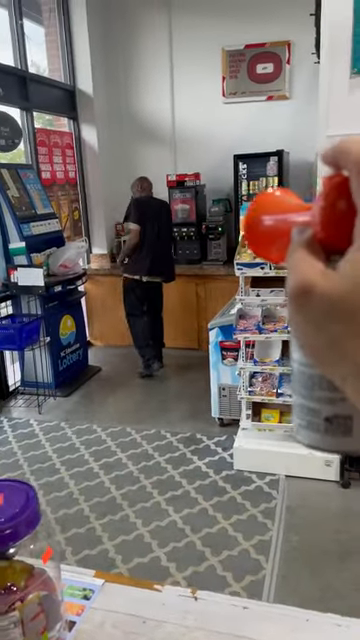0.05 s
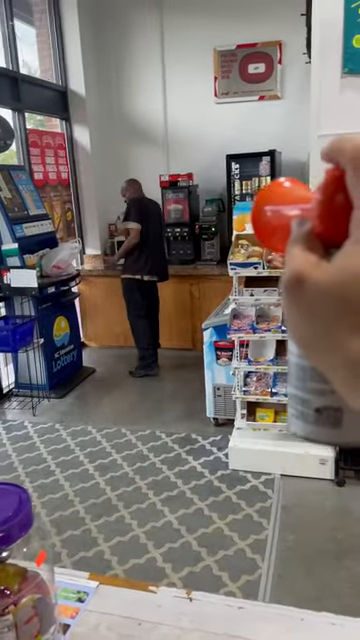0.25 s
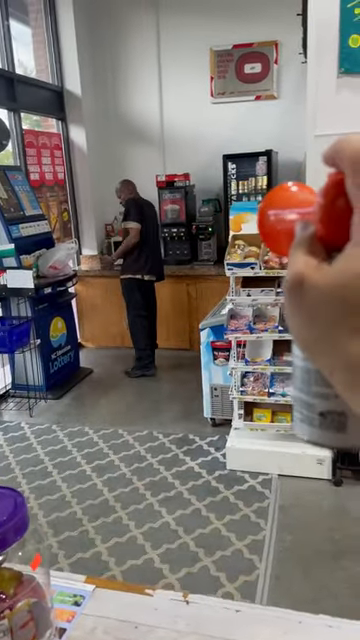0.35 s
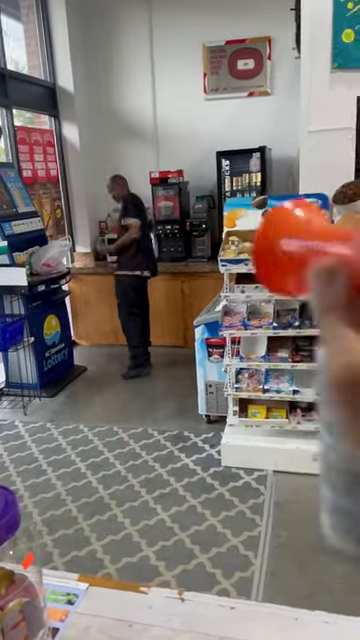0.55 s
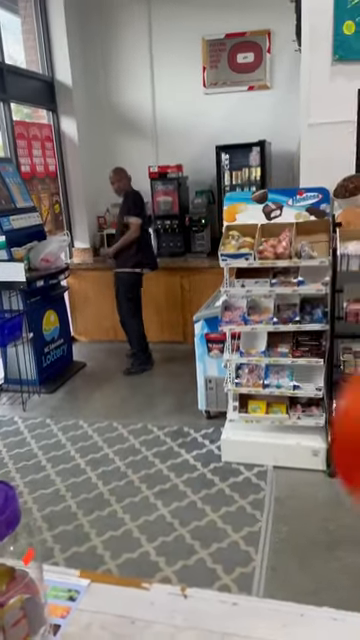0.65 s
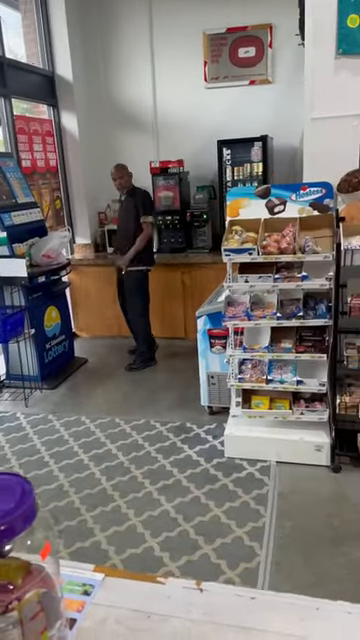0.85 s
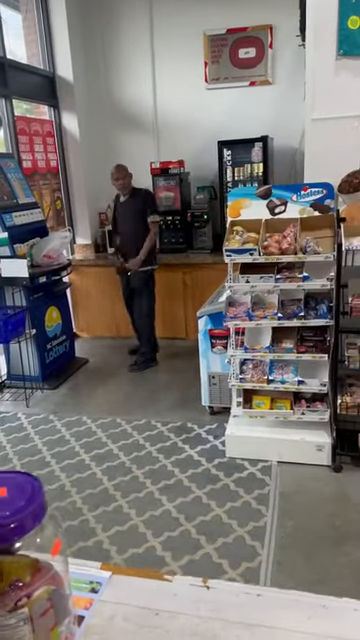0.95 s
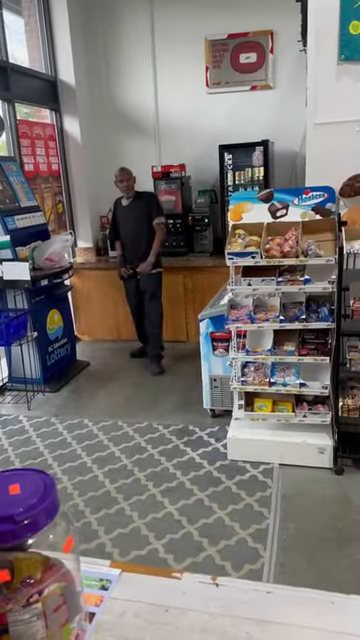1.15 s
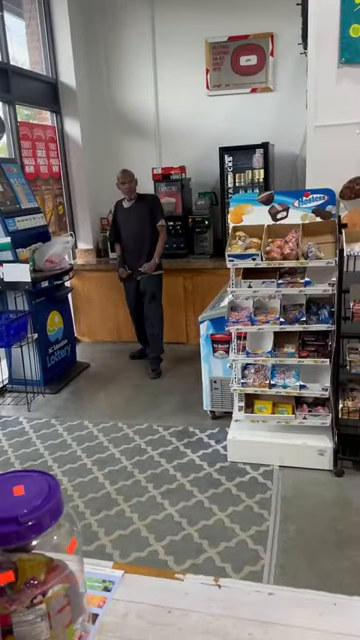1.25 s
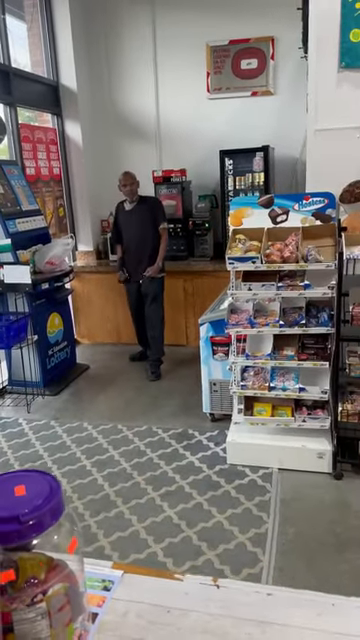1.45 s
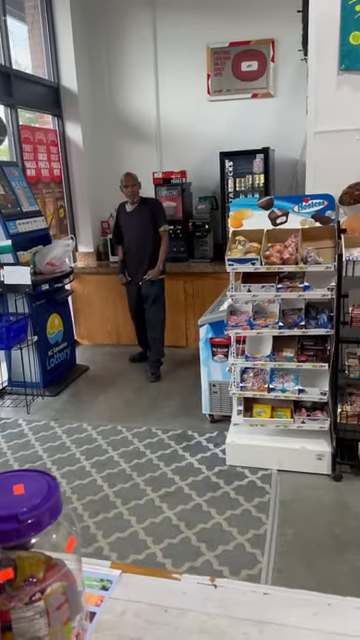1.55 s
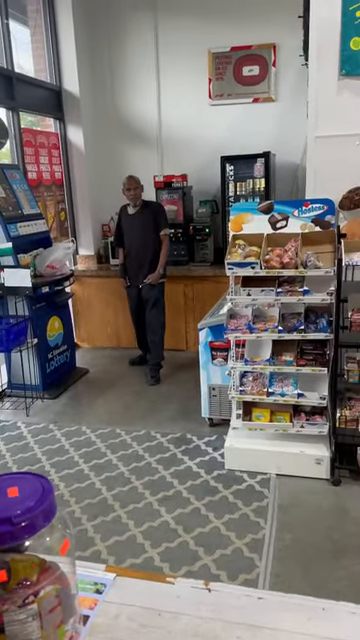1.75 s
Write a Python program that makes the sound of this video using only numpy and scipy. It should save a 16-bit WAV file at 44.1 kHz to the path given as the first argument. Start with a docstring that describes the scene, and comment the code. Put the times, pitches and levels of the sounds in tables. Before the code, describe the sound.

In a small, quiet shop, low cooler hum is broken by one short, piercing, brassy air horn honk close to a phone-like microphone, with air thumps, then a fading echo and much quieter hum.

```python
"""A hand-held gas air horn gives one short blast, right beside the microphone in a small shop.
Its diaphragm starts sharp and drops onto its note, built here from a stack of harmonics.
Shaped noise makes the spit of the valve and the hiss of gas; moving air thumps on the microphone.
The hard room rings on for about a second, over fans and humming coolers made from filtered noise.
The recorder's gain control clamps down on the blast and leaves the hum far quieter afterwards."""
import sys
import numpy as np
from scipy import signal
from scipy.fft import rfft, irfft
from scipy.io import wavfile
from scipy.ndimage import uniform_filter1d

SR = 44100
rng = np.random.default_rng(int(sys.argv[2]) if len(sys.argv) > 2 else 0)


def generate_wav(signal):
    """Clip the signal to [-1, 1] and save it as 16-bit WAV at the path in sys.argv[1]."""
    frames = np.transpose(np.atleast_2d(signal))
    scaled = np.clip(frames, -1, 1) * 32767
    pcm = np.round(scaled).astype(np.int16)
    wavfile.write(sys.argv[1], SR, pcm)


N = 79380
T, HZ = np.arange(N) / SR, np.fft.rfftfreq(N, 1 / SR)

# How the blast swells and brightens: time_s, level_db, overtone_tilt_db_per_octave
BLAST = [(.193, -55.5, -9.5), (.196, -17.5, -14), (.2015, -21.5, -15.5), (.203, -1.5, -7), (.208, 5.5, -4),
         (.2105, -0.5, -8), (.2165, 6, -5.5), (.221, 12, -3), (.245, 17, 1.5), (.30, 16, 0.5),
         (.444, 19, 0)]
# The horn's tone colour at the two microphones: pitch_hz, left_db, right_db
NEAR_COLOUR = [(648, -17, -4), (850, -1.5, -1.5), (1100, -13.5, -12.5), (1296, -15.5, -10), (1385, 0, -2),
               (1620, -13, -12), (1800, -2.5, -2), (1936, 2, -0.5), (2070, -18.5, -13.5), (2230, 1, 0.5),
               (2450, -16.5, -15), (2592, -7.5, -12), (2900, -10.5, -5.5), (3100, -22, -22),
               (3890, -23.5, -24.5), (4540, -22.5, -28.5), (5190, -23.5, -24.5), (5830, -15.5, -19),
               (6517, -23.5, -24), (7130, -17, -19.5), (7650, -26, -27), (8430, -24, -23), (9070, -26, -25),
               (10000, -27, -26.5), (10400, -34.5, -34.5), (11700, -59, -63.5), (13000, -46, -44.5),
               (14200, -30.5, -31), (15600, -33, -33), (16100, -59.5, -60.5)]
# The tone colour that the bell throws into the shop: pitch_hz, level_db
THROWN_COLOUR = [(648, -13.5), (850, -3.5), (1296, -17.5), (1944, -13), (2592, -12.5), (3240, -19.5),
                 (4540, -23), (5830, -20.5), (7130, -23), (8400, -26.5), (10400, -35.5), (11700, -58),
                 (14200, -36.5), (16000, -39.5)]
# How long the shop takes to ring down by 60 dB: pitch_hz, ring_s
ROOM_RING = [(100, 0.61), (650, 1.196), (1300, 1.28), (2600, 0.95), (3500, 1.087), (6000, 0.71),
             (9000, 0.48), (15000, .35)]
# The tone colour of the escaping gas: pitch_hz, relative_level_db_per_hz
GAS_COLOUR = [(100, -13.5), (500, -9.5), (1200, -8), (2400, 1), (3400, -9.5), (6000, -0.5), (8300, -3.5),
              (9600, -7.5), (10500, -36), (11500, -45.5), (13000, -33), (14500, -8), (15700, -11.5),
              (16200, -32)]
# How loud the gas hisses over time: time_s, level_db
HISS_LEVEL = [(.186, -58.5), (.192, -26), (.197, -22.5), (.201, -33.5), (.215, -19), (.235, 2), (.275, 2.5),
              (.325, -10.5), (.444, -10.5), (.46, -38.5)]
# Puffs of air that push on the microphone: middle_s, length_s, pitch_hz, level_db
PUFFS = [(.245, 0.013, 55, 4), (.33, 0.024, 62, -3), (0.61, .08, 45, -25.5)]
# The tone colour of the air noise in the shop: pitch_hz, relative_level_db_per_hz
SHOP_COLOUR = [(25, -20.5), (60, -9), (100, 0.5), (160, -2.5), (250, -5.5), (400, -10), (630, -15.5),
               (1000, -15), (1600, -23), (2500, -24), (4000, -26.5), (6300, -33.5), (9000, -42.5),
               (11000, -61.5), (16000, -63.5)]
# Narrow bands of cooler hum: pitch_hz, width_hz, level_db
COOLER_HUM = [(117.5, 13, -34), (248, 14, -47), (376, 14, -50)]

# Horn: the pitch starts SHARP_HZ above the note; jitter is a share of the pitch
NOTE_HZ, SHARP_HZ, START_S, SETTLE_S, SETTLE_SHAPE = 648, 290, .2, .022, 1.4
JITTER, EARLY_JITTER, STEADY_S, JITTER_HZ = 0.0018, .028, .04, 600
RELEASE_DB_PER_S = 1501  # the valve shuts fast
LEFT_LAG_S = 3.88e-5
DRIFT_DB, DRIFT_RAD, DRIFT_HZ = 0.5, 0.38, 5
# Room, spitting valve and moving air
ROOM_DB, ROOM_DELAY_S, ROOM_BUILD_S, ROOM_ALIKE_HZ = -1, .008, 0.025, 1000
SPIT_S, SPIT_LENGTH_S, SPIT_DB, SPIT_BRIGHT_HZ = .196, 0.0027, -25.5, 6995
DRAFT_S, DRAFT_RISE_S, DRAFT_DB, DRAFT_FALL_DB_PER_S, DRAFT_HZ = .25, 0.014, -5.5, 108.5, 190
# Shop background, then the recorder: gain control, overload and highest pitch
SHOP_DB, SHOP_ALIKE_HZ = -35.5, 1500
LIMIT_DB, RATIO, CLAMP_S, RECOVER_DB_PER_S, CEILING = -14, 19, 0.0055, 1, 1
EDGE_HZ = 16250


def diaphragm():
    """The buzzing disc starts sharp and shaky, then settles; returns its pitch and turns so far."""
    age = np.maximum(T - START_S, 0)
    hz = NOTE_HZ + SHARP_HZ * np.exp(-(age / SETTLE_S) ** SETTLE_SHAPE)
    shake = noise_pair(1 / (1 + (HZ / JITTER_HZ) ** 2), JITTER_HZ)[0]
    jitter = JITTER + EARLY_JITTER * np.exp(-age / STEADY_S)
    turns = np.cumsum(hz * (1 + shake * jitter)) / SR
    return hz, turns


def horn(hz, turns, colour, axis=1, lag_s=0, count=25):
    """Harmonics through the bell brighten as pressure builds and drift as the hand moves."""
    outside_s = np.maximum(T - BLAST[-1][0], 0) + np.maximum(BLAST[0][0] - T, 0)
    level_db = curve(BLAST) - RELEASE_DB_PER_S * outside_s
    tilt_db = curve(BLAST, axis=2)
    out = np.zeros(N)
    for k in range(1, count + 1):
        colour_db = spectrum(colour, k * hz, axis=axis)
        db = level_db + colour_db + tilt_db * np.log2(k) + DRIFT_DB * wander(DRIFT_HZ)
        # staggered starting phases keep the harmonics from peaking together
        phase = 2 * np.pi * k * (turns - lag_s * hz) + np.pi * k * k / count
        phase += DRIFT_RAD * wander(DRIFT_HZ)
        in_band = k * hz < EDGE_HZ
        out += amp(db) * in_band * np.cos(phase)
    return np.sqrt(2) * out


def gas():
    """Escaping gas is rushing noise: the valve spits as it opens and hisses under the note."""
    is_open = (T > HISS_LEVEL[0][0]) & (T < HISS_LEVEL[-1][0])
    hiss = noise_pair(amp(spectrum(GAS_COLOUR, HZ)), alike_hz=3000) * amp(curve(HISS_LEVEL)) * is_open
    spit_noise = noise_pair(1 / (1 + (HZ / SPIT_BRIGHT_HZ) ** 2), alike_hz=2999)
    spit = spit_noise * amp(SPIT_DB) * np.exp(-abs(T - SPIT_S) / SPIT_LENGTH_S)
    return hiss + spit


def draft():
    """Moving air pushes on the microphone, giving low rumble and thumps."""
    rise = np.exp(-np.maximum(DRAFT_S - T, 0) / DRAFT_RISE_S)
    fall = amp(DRAFT_DB - DRAFT_FALL_DB_PER_S * np.maximum(T - DRAFT_S, 0))
    low_band = HZ / (HZ + 50) / (1 + (HZ / DRAFT_HZ) ** 2)
    out = rise * fall * noise_pair(low_band, alike_hz=120)
    for middle_s, length_s, hz, db in PUFFS:
        swell = np.exp(-((T - middle_s) / length_s) ** 2)
        out = out + amp(db) * swell * np.sin(2 * np.pi * hz * (T - middle_s))
    return out


def room(x):
    """Hard walls and shelves send back dense reflections, and the treble dies first."""
    hz, t, z = signal.stft(noise_pair(1, ROOM_ALIKE_HZ), SR, nperseg=256)
    fade = amp(-60 * t / spectrum(ROOM_RING, hz)[:, None])
    tail = signal.istft(z * fade, SR, nperseg=256)[1][:, :N]
    tail *= np.clip((T - ROOM_DELAY_S) / ROOM_BUILD_S, 0, 1)
    tail /= np.sqrt(SR / np.log(1e6))  # energy of a plain ring that lasts one second
    return amp(ROOM_DB) * signal.fftconvolve(x[None], tail, axes=1)[:, :N]


def shop():
    """Fans make broad air noise; cooler compressors beat as narrow bands of noise."""
    out = amp(SHOP_DB) * noise_pair(amp(spectrum(SHOP_COLOUR, HZ)), SHOP_ALIKE_HZ)
    for hz, width_hz, db in COOLER_HUM:
        band = np.exp(-((HZ - hz) / width_hz) ** 2)
        out = out + amp(db) * noise_pair(band, SHOP_ALIKE_HZ)
    return out


def amp(db):
    """Turns decibels into a gain."""
    return 10 ** (np.asarray(db) / 20)


def unit(x):
    """Scales a sound to an average (rms) level of 1."""
    return x / np.sqrt(np.mean(x ** 2) + 1e-20)


def spectrum(table, hz, axis=1):
    """Reads one column of a table at any pitch, with pitch on a log scale."""
    rows = np.array(table, float)
    return np.interp(np.log(hz + 1), np.log(rows[:, 0] + 1), rows[:, axis])


def curve(table, axis=1):
    """Reads one column of a table over time."""
    rows = np.array(table, float)
    return np.interp(T, rows[:, 0], rows[:, axis])


def noise_pair(gain, alike_hz):
    """Makes coloured noise for two microphones: much alike below alike_hz, less and less above."""
    a, b = rfft(rng.standard_normal((2, N)))
    same = .97 / (1 + (HZ / alike_hz) ** 2)
    second = same * a + np.sqrt(1 - same ** 2) * b
    return unit(irfft(np.array([a, second]) * gain, N))


def wander(rate_hz, count=6):
    """Adds slow sine waves into a random curve of about unit size."""
    hz = rate_hz * rng.uniform(.2, 1, (count, 1))
    phase = rng.random((count, 1))
    coarse = np.linspace(0, T[-1], 200)
    waves = np.sin(2 * np.pi * (hz * coarse + phase))
    return np.interp(T, coarse, waves.sum(0)) * np.sqrt(2 / count)


def scene():
    """Adds the close horn, its ring in the shop, the gas, the moving air and the background."""
    hz, turns = diaphragm()
    left = horn(hz, turns, NEAR_COLOUR, axis=1, lag_s=LEFT_LAG_S)
    right = horn(hz, turns, NEAR_COLOUR, axis=2)
    ring = room(horn(hz, turns, THROWN_COLOUR))
    return np.array([left, right]) + ring + gas() + draft() + shop()


def record(dry):
    """Gain control clamps in milliseconds and recovers slowly; peaks are rounded, top treble cut."""
    power = uniform_filter1d((dry ** 2).mean(0), size=136)  # averaged over about 3 ms
    power_db = 10 * np.log10(abs(power) + 1e-12)
    # hold the largest overshoot, letting it sink at the recovery rate
    recovery = RECOVER_DB_PER_S * T
    over_db = np.maximum.accumulate(np.maximum(power_db - LIMIT_DB, 0) + recovery) - recovery
    keep = np.exp(-1 / (CLAMP_S * SR))
    smooth_over_db = signal.lfilter([1 - keep], [1, -keep], over_db)
    held = dry / amp((1 - 1 / RATIO) * smooth_over_db)
    rounded = held / (1 + (held / CEILING) ** 4) ** .25
    low_pass = signal.firwin(511, EDGE_HZ, window=("kaiser", 9), fs=SR)
    return signal.oaconvolve(rounded, low_pass[None], "same")


dry = scene()
out = record(dry)
generate_wav(out)
```